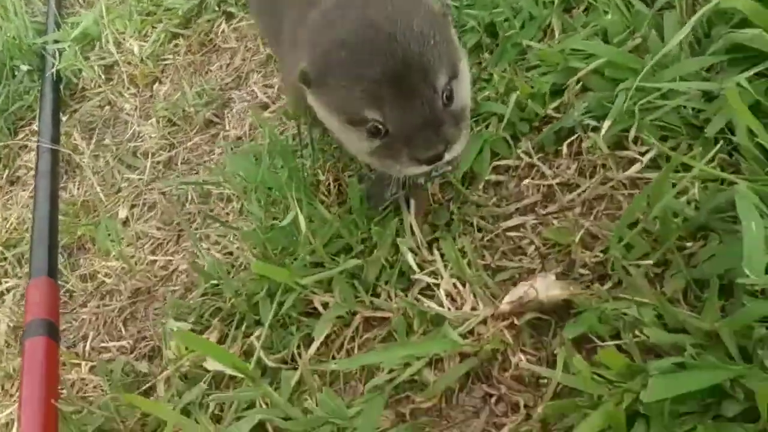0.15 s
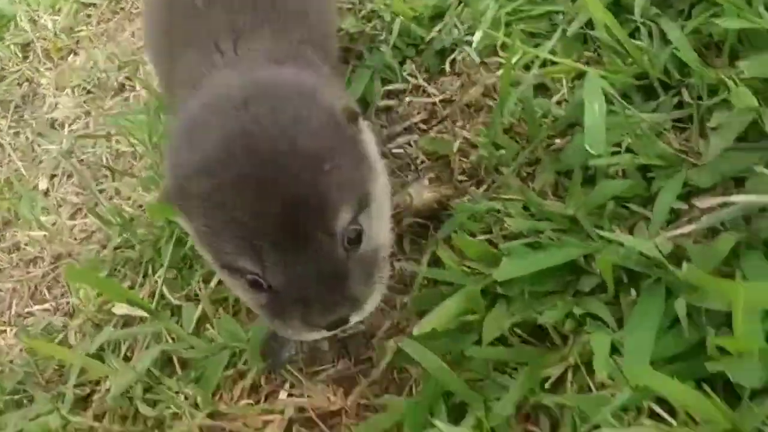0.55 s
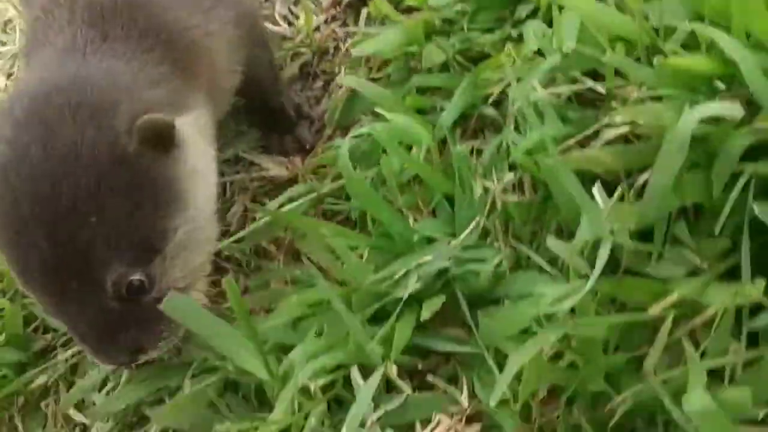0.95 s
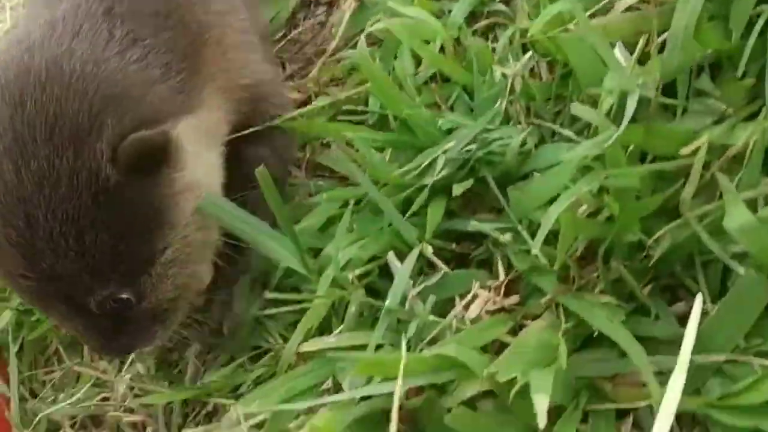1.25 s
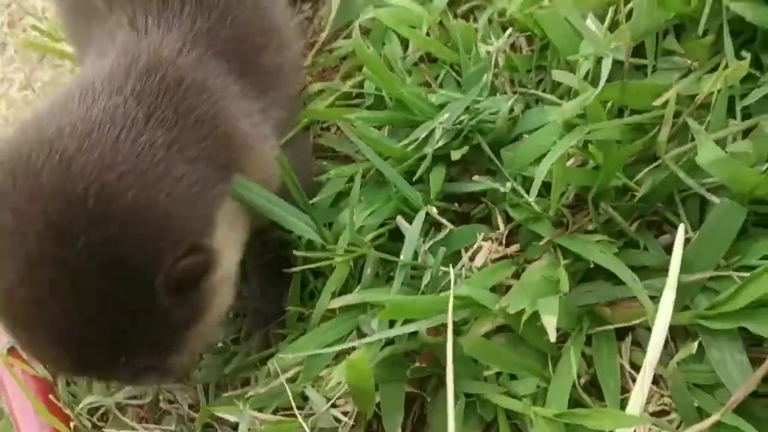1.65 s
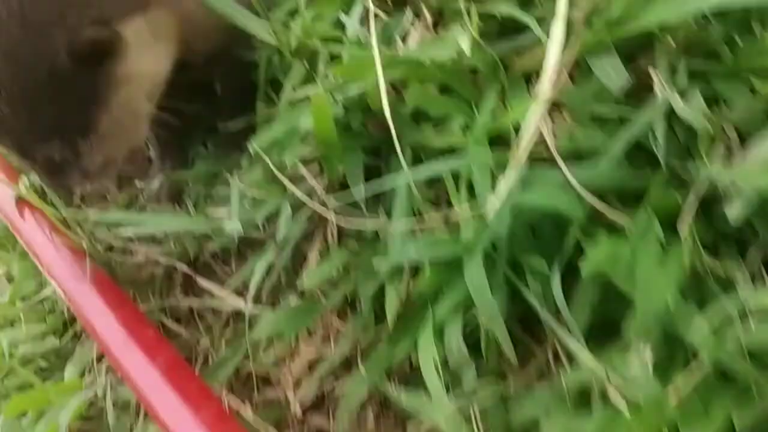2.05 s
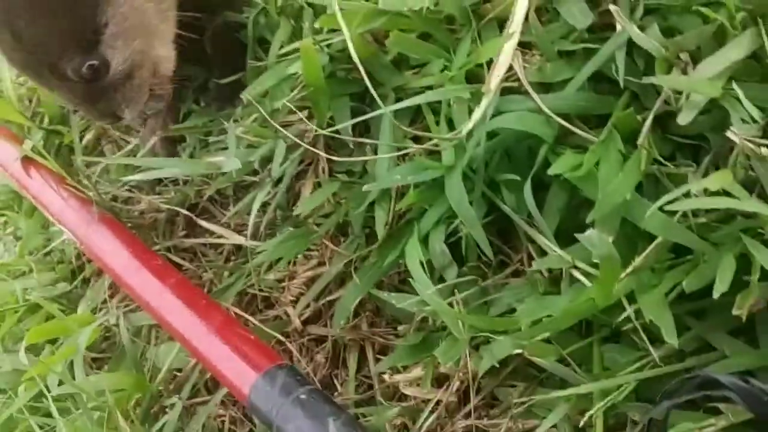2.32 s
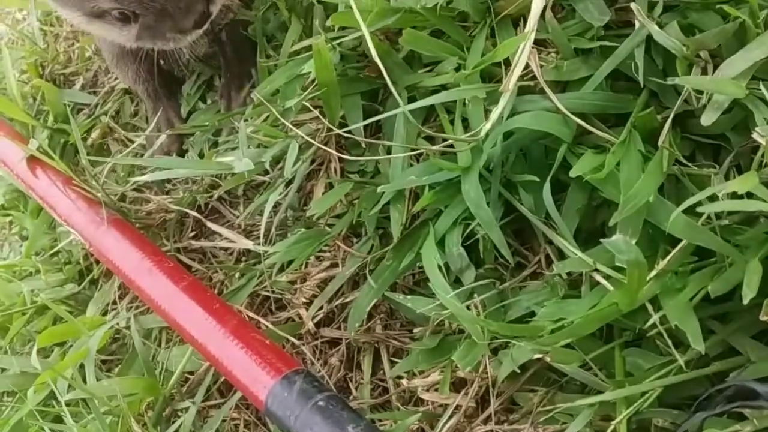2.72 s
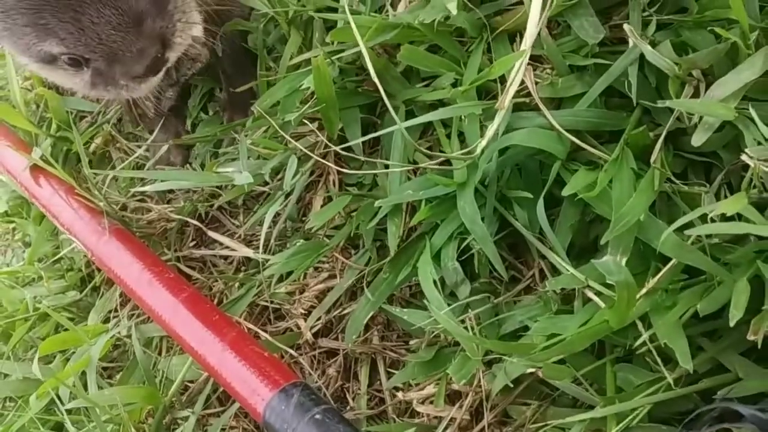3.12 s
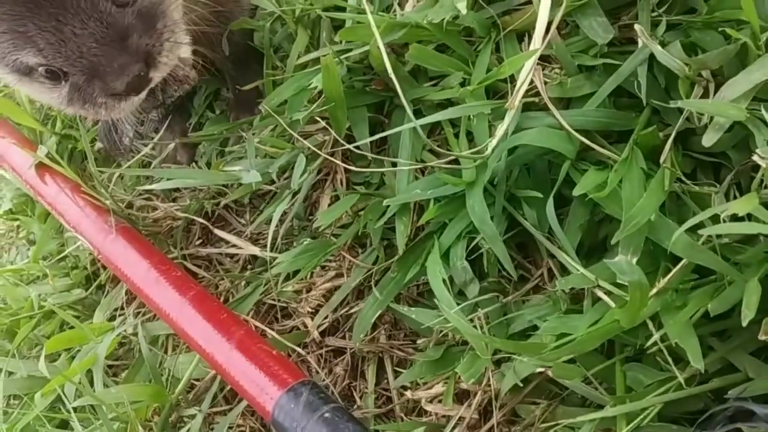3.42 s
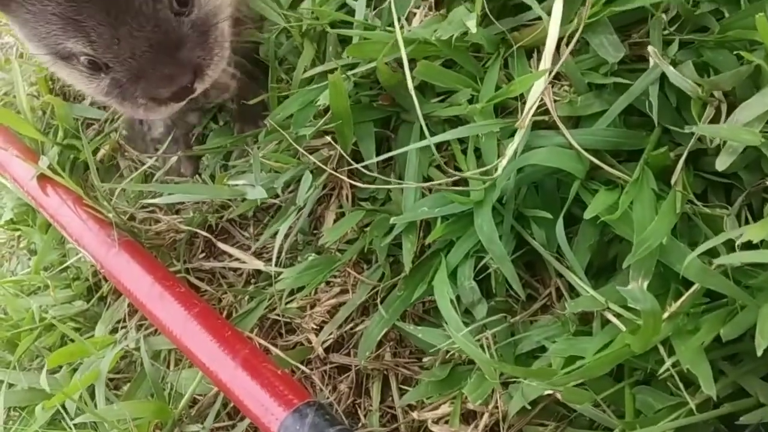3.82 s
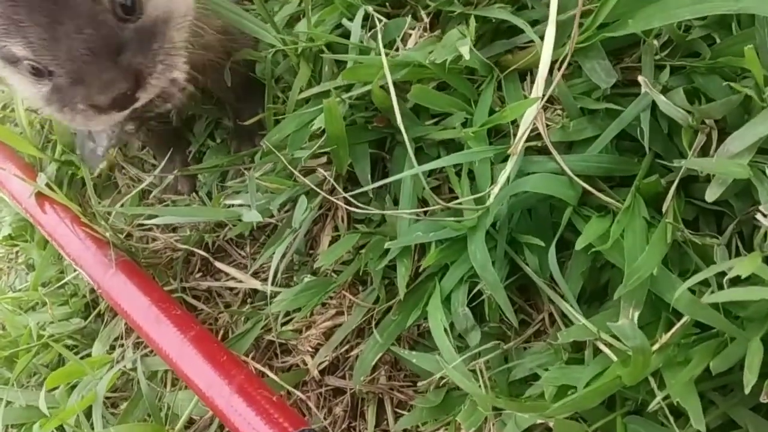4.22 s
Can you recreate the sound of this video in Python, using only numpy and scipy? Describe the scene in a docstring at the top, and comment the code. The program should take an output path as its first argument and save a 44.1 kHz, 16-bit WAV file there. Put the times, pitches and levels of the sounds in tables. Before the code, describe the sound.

An otter pup gives a few piercing, steeply falling squeaks close on the left, over low wind rumble and faint grass rustle.

```python
"""Otter pup calling in grass

An otter pup squeaks five steeply falling calls, close on the left of a stereo recorder: partials on a
gliding pitch, weighted by throat resonances, with turbulent noise where the voice breaks.
Wind and a far low drone, both shaped noise, rumble below, under a faint hiss.
Grass rustles as swelling bright noise and ticks as short decaying bursts.
"""
import sys
import numpy as np
from scipy import signal
from scipy.fft import rfft, irfft
from scipy.io import wavfile
from scipy.ndimage import uniform_filter1d

SR = 44100
rng = np.random.default_rng(int(sys.argv[2]) if len(sys.argv) > 2 else 0)


def waveform_to_disk(signal):
    """Save audio, clipped to [-1, 1], as 16-bit WAV at the path in sys.argv[1]."""
    frames = np.transpose(np.atleast_2d(signal))
    scaled = np.clip(frames, -1, 1) * 32767
    samples = np.round(scaled).astype(np.int16)
    wavfile.write(sys.argv[1], SR, samples)


N = 192756


def from_db(db):
    """Decibel law: an amplitude gain is ten to the power of level over twenty."""
    return 10 ** (np.asarray(db) / 20)


def rms_one(x):
    """Power normalisation: divide by the root mean square."""
    return x / np.sqrt(np.mean(x ** 2) + 1e-20)


def at_hz(points, hz):
    """Spectral envelope: second column interpolated on a logarithmic frequency axis."""
    freq_hz, value = np.array(points).T
    return np.interp(np.log(hz), np.log(freq_hz), value)


def bin_hz():
    """Discrete spectrum: the frequency of each bin, with 1 Hz as the floor."""
    return np.maximum(np.fft.rfftfreq(N, 1 / SR), 1)


def shaped(x, points):
    """Linear filtering: each frequency is scaled by an envelope in dB."""
    return irfft(rfft(x) * from_db(at_hz(points, bin_hz())), N)


def drift(rate_hz):
    """Random modulation: white noise through two one-pole low-passes, scaled to rms 1."""
    pole = np.exp(-2 * np.pi * rate_hz / SR)
    noise = rng.standard_normal(N + SR)
    # the first second lets the filter settle
    return rms_one(signal.lfilter([1], [1, -2 * pole, pole ** 2], noise)[SR:])


def swells(centre_s, peak_db, fall_db_per_s, hold_s=0):
    """Exponential growth and decay: one gain row an event, straight dB slopes around a held peak."""
    away_s = np.maximum(abs(np.arange(N) / SR - centre_s[:, None]) - hold_s, 0)
    return from_db(peak_db[:, None] - fall_db_per_s * away_s)


def tearing():
    """Onset of turbulence: the gain of the rasp rises wherever the voice breaks."""
    # voice breaks, where the airflow tears: middle_s, half_length_s, rasp_db
    voice_breaks = [(0.027, .025, -62), (0.134, 0.0028, -65), (0.223, 0.0068, -49), (2.605, 0.0088, -44),
                    (2.631, .008, -35), (2.652, 0.0059, -23), (2.681, 0.018, -34), (2.787, .001, -31),
                    (2.82, .028, -56), (3.16, .006, -45), (3.214, 0.028, -63), (2.968, 0.019, -44),
                    (3, 0.013, -38.5), (3.254, 0.0056, -37.5), (3.276, 0.0061, -28), (3.319, 0.0052, -34),
                    (3.33, 0.014, -43), (3.615, .002, -29), (3.624, 0.0024, -20), (3.641, 0.016, -25),
                    (3.671, 0.0095, -35.5), (4.138, 0.006, -21.5), (4.151, 0.013, -27), (4.205, 0.013, -43)]
    middle_s, half_s, rasp_db = np.transpose(voice_breaks)
    return swells(middle_s, rasp_db, fall_db_per_s=1398, hold_s=half_s[:, None]).max(axis=0)


def torn_air(strand_db, flicker_db):
    """Turbulence exciting cavity resonances: broad noise plus strands that flare independently; rms 1."""
    # spectrum of the broad turbulence: freq_hz, level_db
    rasp_colour = [(1800, -48), (2700, -34), (3300, -15), (4200, 6), (5200, -2), (6500, -22), (8500, 8),
                   (10000, 15), (12000, -13), (14500, -3), (16000, 4)]
    # cavities in which torn airflow rings: freq_hz, width_hz, level_db
    rasp_modes = [(3610, 170, 1), (4700, 240, 3.5), (5950, 180, 5.5), (8380, 200, 5), (10450, 670, 7.5),
                  (12100, 330, 8), (14600, 410, 4), (14400, 750, -6)]
    air = rms_one(shaped(rng.standard_normal(N), rasp_colour)) * from_db(2.0 * drift(250))
    for freq_hz, width_hz, level_db in rasp_modes:
        pole = np.exp(-np.pi * width_hz / SR)
        resonator = [1, -2 * pole * np.cos(2 * np.pi * freq_hz / SR), pole ** 2]
        ring = signal.lfilter([1, 0, -1], resonator, rng.standard_normal(N))
        air += from_db(strand_db + level_db + flicker_db * drift(57)) * rms_one(ring)
    return rms_one(air)


def call_sound(call, upper_db, tilt_db, upper_fray, chance, breaks, rasp_noise,
               flutter_db, wobble, skirt_db, patchy_db, jitter=.004):
    """Source-filter voice: throat-weighted partials of a gliding pitch, unsteadied by rasp."""
    # resonances of throat and mouth: freq_hz, gain_db
    throat = [(1200, -25.5), (1600, -14.5), (1900, -1), (2250, -12), (3000, -16.5), (3500, -18),
              (4500, -25), (5600, -13), (7200, 0.5), (8200, -0.5), (9800, -8.5), (11700, -2.5), (13000, -7),
              (15800, 3)]
    # third to eighth partial against the upper level: level_db
    upper_fall_db = [10, -4.5, -9.5, -21, -30, -33]
    tail_hz, tail_lift_db = 1880, 1   # below this pitch the voice is clean, its upper partials stand out
    upper_glide_db = -0.8743   # change of the upper partials for each octave a second of glide

    t = np.arange(N) / SR
    point_s, *columns = np.transpose(call)
    on = (t >= point_s[0]) & (t < point_s[-1])
    pitch, first_db, second_db = [np.interp(t[on], point_s, c) for c in columns]
    pitch = uniform_filter1d(pitch, size=200, mode="nearest")   # the folds retune over a few milliseconds
    fade_in, fade_out = (t[on] - point_s[0]) / .0006, (point_s[-1] - t[on]) / .002
    fade = np.clip(np.minimum(fade_out, fade_in), 0, 1)

    loudest_db = np.maximum(first_db + at_hz(throat, pitch), second_db + at_hz(throat, 2 * pitch))
    rasp = breaks[on]
    rough = np.clip(rasp / from_db(loudest_db), 0, 1)   # noise against tone
    glide = abs(np.gradient(np.log2(pitch))) * SR   # octaves a second
    glide = uniform_filter1d(glide, size=400, mode="nearest")
    tail = np.clip((tail_hz - pitch) / 200, 0, 1)
    sway, fray, slow_a, slow_b, *shake = [c[on] for c in chance]
    phase = 2 * np.pi * np.cumsum(pitch * (1 + (jitter + wobble * rough ** 2) * sway)) / SR

    upper_level = second_db + upper_db + upper_glide_db * glide + tail_lift_db * tail
    levels = [first_db, second_db]
    levels += [upper_level + fall_db + tilt_db * k for k, fall_db in enumerate(upper_fall_db)]
    sound = rasp * rasp_noise[on]
    for k, level_db in enumerate(levels, 1):
        unsteady_db = flutter_db * rough * (np.tanh(shake[k % 3]) - .4)   # a rough voice keeps dropping out
        # cycle-to-cycle unevenness spreads noise around each line
        skirt = 1 + from_db(skirt_db) * rough * fray * min(k - .6, 2)
        if k > 2:   # upper partials come and go, and fray more the higher they are
            unsteady_db += patchy_db * (np.tanh(2.9 * (slow_a, slow_b)[k % 2]) - .5)
            skirt += upper_fray * fray * (k - 2) * (1 - tail) * (k * pitch < 15500)
        if k == 1:   # in a high voice break the lowest partial dissolves into a band of noise
            torn = np.clip(2.5 * rough, 0, 1) * np.clip((pitch - 3700) / 600, 0, 1)
            skirt = (1 - torn) * skirt + .7 * torn * fray
        gain = from_db(level_db + at_hz(throat, k * pitch) + unsteady_db)
        audible = k * pitch < SR / 2.2   # guards against aliasing
        sound += np.sqrt(2) * gain * skirt * np.sin(k * phase) * audible
    out = np.zeros(N)
    out[on] = fade * sound
    return out


def pup(scatter_db, scatter_t60):
    """Interaural differences: the right port is shaded and shifted in time; ground and grass scatter."""
    # one table a note (the second call cracks into two): time_s, pitch_hz, first_partial_db, overtones_db
    notes = [
        [(0.0, 5875, -17.5, -33), (0.032, 6035, -15.5, -21), (0.068, 5500, -27, -23), (0.098, 5620, -23, -23),
         (0.118, 5350, -21.5, -30), (0.134, 4830, -22, -31.5), (0.146, 4620, -17, -25.5),
         (0.17, 4580, -20, -27), (0.194, 4520, -22.5, -25.5), (0.216, 4130, -20, -24), (0.224, 3480, -10, -39),
         (0.232, 3280, -3.5, -33), (0.26, 3125, -2.5, -23.5), (0.29, 2950, -10.5, -33.5),
         (0.304, 2820, -19.5, -46), (0.312, 2760, -18, -50)],
        [(2.591, 7020, -15, -40), (2.594, 7240, -9.5, -22), (2.606, 7410, -4, -24), (2.615, 7190, -8.5, -22),
         (2.624, 6640, -5.5, -23), (2.631, 6120, -1, -21), (2.636, 5230, -12, -4.5), (2.652, 4550, -20, -32.5),
         (2.664, 3605, -4, -15), (2.682, 3583, -5, -18), (2.7, 3640, -4, -21.5), (2.707, 3860, -22, -32)],
        [(2.707, 4520, -2.5, -25), (2.74, 4370, -11.5, -20), (2.77, 4166, -20, -18), (2.776, 3700, -3.5, -27.5),
         (2.812, 3354, 3.5, -13.5), (2.832, 3053, 4, -7.5), (2.85, 2767, 1, -11), (2.878, 2610, -16.5, -23),
         (2.892, 2440, -17.5, -18), (2.912, 2105, -28.5, -26), (2.95, 1794, -22.5, -39),
         (2.996, 1555, -14, -16.5), (3.006, 1225, -17, -33), (3.022, 1140, -57, -69)],
        [(3.1595, 7800, -15, -36), (3.165, 6900, -10, -17), (3.174, 6650, -5, -25), (3.179, 6430, -15, -15),
         (3.183, 6100, -5, -13.5), (3.194, 5654, -7.5, -11), (3.203, 5590, -5.5, -11), (3.222, 5800, -4, -12),
         (3.24, 5700, -2.5, -14.5), (3.256, 5100, -12, -11), (3.276, 4480, -12, -23), (3.286, 3584, -2, -18.5),
         (3.304, 3387, -3, -17.5), (3.314, 3160, -14, -10.5), (3.334, 2506, -15, -22), (3.35, 2020, -18.5, -21),
         (3.376, 1740, -20.5, -33), (3.405, 1616, -20, -27), (3.44, 1520, -18.5, -22),
         (3.458, 1450, -24.5, -33)],
        [(3.6025, 7150, -11, -36), (3.6045, 7100, -7.5, -24), (3.612, 6585, -4.5, -25),
         (3.618, 5810, -1.5, -20), (3.624, 4693, -7.5, -28), (3.6285, 3990, -2, -10), (3.632, 3637, -1, -19),
         (3.645, 3176, -11.5, -18), (3.655, 2760, -9.5, -26), (3.662, 2196, -13, -24), (3.673, 1970, -20, -21),
         (3.695, 1910, -24, -26), (3.715, 1770, -26, -42), (3.739, 1584, -24.5, -20.5),
         (3.77, 1523, -24.5, -20.5), (3.801, 1470, -25, -32)],
        [(4.1115, 7060, -35, -50), (4.113, 6600, -8.5, -13), (4.122, 6270, -9.5, -27), (4.127, 6020, 0.5, -13),
         (4.132, 5240, -11, -9.5), (4.142, 4670, -22, -10), (4.15, 3550, 2, -24.5), (4.17, 3588, 0.5, -19.5),
         (4.19, 3410, 2.5, -19), (4.21, 3015, -4.5, -21), (4.234, 2640, -10, -20.5), (4.258, 2100, -31.5, -38),
         (4.282, 1747, -24, -32), (4.31, 1600, -20.5, -18.5), (4.354, 1465, -28.5, -33)],
    ]
    # one a note, upper partials against the overtones: level_db
    upper_levels = [-11, -16, -12.5, -10, -21.5, -11.5]
    # one a note, brightness gained at each further partial: tilt_db
    upper_tilts = [6, 4, 1.5, 2.5, 1, -2]
    # one a note, noise spread around the upper partials, against their height: fraction
    upper_frays = [.03, .3, .2, .3, .35, .15]
    # one a note, as the head turns; negative where the right port leads: lag_s
    right_lags = [-0.0045, .00011, .00011, .0001, .00008, .00012]
    # shading by the recorder body: freq_hz, left_over_right_db
    body_shadow = [(1000, 8), (2500, 1), (3300, 14), (3900, 10), (5000, 11.5), (6000, 22.5), (7000, 12),
                   (8500, 82), (12000, 20), (14500, 15), (16000, 12)]

    # a loose fold edge beats near 1.2 kHz against the voice and splits each line into strands
    edge_level = drift(60)
    edge_phase = 2 * np.pi * np.cumsum(1200 + 250 * drift(20)) / SR
    beating = drift(700) + edge_level * np.sin(edge_phase)
    # pitch sway, fraying, two slow patchinesses, three shakes
    chance = [drift(303), beating, drift(21), drift(19), drift(205), drift(160), drift(191)]
    rasp_noise = torn_air(strand_db=-7, flicker_db=4)
    breaks = tearing()

    hz = np.fft.rfftfreq(N, 1 / SR)
    left, late_spectrum = 0, 0
    for call, upper_db, tilt_db, upper_fray, lag_s in zip(
            notes, upper_levels, upper_tilts, upper_frays, right_lags):
        sound = call_sound(call, upper_db, tilt_db, upper_fray, chance, breaks, rasp_noise,
                           flutter_db=6, wobble=.03, skirt_db=-11, patchy_db=4)
        left = left + sound
        late_spectrum = late_spectrum + rfft(sound) * np.exp(-2j * np.pi * hz * lag_s)
    right = shaped(irfft(late_spectrum, N), [(f, -db) for f, db in body_shadow])

    echo_s = np.arange(2000) / SR
    echoes = rng.standard_normal((2, 2000)) * from_db(scatter_db - 60 * echo_s / scatter_t60)
    echoes[:, :60] = 0   # the first echo travels half a metre further
    echoes[1] = signal.lfilter([.45], [1, -.55], echoes[1])   # the shaded port hears it duller
    return np.array([left, right]) + signal.fftconvolve(left[None], echoes, axes=1)[:, :N]


def stereo_noise(spectrum):
    """Interchannel coherence: ports share the bass, while the treble is unlike and leans left; mid rms 1."""
    # correlation of the two ports: freq_hz, likeness
    port_likeness = [(60, 0.62), (150, 0.86), (380, 0.64), (950, 0.25), (2380, -0.07), (5980, 0.01),
                     (15000, 0.04)]
    # balance of the two ports: freq_hz, left_over_right_db
    port_tilt = [(60, 1.5), (150, -2.5), (380, -1), (950, 0), (2380, 3), (5980, 1.5), (15000, 13)]
    hz = bin_hz()
    mid, side = rfft(rng.standard_normal((2, N))) * from_db(at_hz(spectrum, hz))
    alike = np.clip(at_hz(port_likeness, hz), -1, 1)
    lean_db = at_hz(port_tilt, hz) / 2
    signs = np.array([[1], [-1]])   # left, right
    pair = np.sqrt(1 + alike) * mid + np.sqrt(1 - alike) * side * signs
    pair = irfft(pair * from_db(lean_db * signs), N)
    return pair / np.sqrt(np.mean(pair.mean(axis=0) ** 2))


def wind_on_ports():
    """Flow noise: independent low-frequency noise at each port swells with every buffet."""
    # buffets of wind: time_s, peak_db, left_over_right_db
    gusts = [(0.0, -44, -16), (0.35, -49, -4), (0.579, -53, -1), (0.71, -42, -19), (0.865, -30, -11),
             (0.98, -35, -11), (1.11, -31, -19.5), (1.33, -62, 7.5), (1.9, -34, -23.5), (2.13, -51, -8),
             (2.3, -46, -21), (2.62, -48, -3), (3.06, -41, 9), (3.3, -43, 20), (3.6, -44, 12),
             (3.829, -33.5, 23), (4.156, -28.5, 18.5), (4.37, -38, 24.5)]
    # spectrum of the rumble: freq_hz, level_db
    wind_colour = [(10, -60), (20, 7), (40, -1), (70, -8.5), (130, -19), (250, -20), (500, -63)]
    calm_db = -50
    time_s, peak_db, lean_db = np.transpose(gusts)
    port_gain = from_db(lean_db / 2 * [[1], [-1]])
    buffets = from_db(calm_db) + port_gain @ swells(time_s, peak_db, fall_db_per_s=140)
    return buffets * rms_one(shaped(rng.standard_normal((2, N)), wind_colour))


def drone():
    """Band-wise modulation: a near-steady low noise whose upper edge comes and goes."""
    # spectrum of the drone: freq_hz, level_db
    drone_colour = [(29, -75), (50, -3.5), (86, -2), (130, 0.5), (167, -5.5), (203, -8), (372, -30.5),
                    (408, -30), (600, -36), (780, -73), (1320, -120)]
    # slow change of the drone, the last column above about 230 Hz: time_s, level_db, edge_gain_db
    drone_course = [(0, -34.5, -3), (.5, -36, -0.5), (1, -35, 5), (1.5, -35, -6.5), (2, -36, -2.5),
                    (2.6, -34.5, 3), (3.1, -35.5, 2), (3.6, -36.5, 4.5), (4.0, -35, -1), (4.37, -36, 7)]
    edge_sway_db = 2.0   # the upper edge wavers a few times a second
    time_s, *columns = np.transpose(drone_course)
    level_db, edge_db = [np.interp(np.arange(N) / SR, time_s, c) for c in columns]
    hum = stereo_noise(drone_colour)
    edge = shaped(hum, [(210, -60), (250, 0)])
    edge_gain = from_db(edge_db + edge_sway_db * drift(3.1))
    return from_db(level_db) * (hum + (edge_gain - 1) * edge)


def patchy(x, patchy_db):
    """Octave-band modulation: each octave swells and sinks on its own."""
    spectrum, octave = rfft(x), np.log2(bin_hz() / 250)
    shares = [np.clip(1 - abs(octave - k), 0, 1) for k in range(7)]
    return sum(from_db(patchy_db * drift(10)) * irfft(spectrum * share, N) for share in shares)


def faint_hiss():
    """Broadband noise: a faint hiss whose octaves waver separately."""
    # spectrum of the hiss: freq_hz, level_db
    hiss_colour = [(210, -6.5), (350, -6.5), (647, -6), (1070, -8), (1230, -11), (1950, -8), (2670, -10.5),
                   (5120, -16.5), (7000, -19.5), (9100, -87), (15400, -120)]
    return from_db(-53) * patchy(stereo_noise(hiss_colour), patchy_db=1.8)


def grass_rustle():
    """Friction noise: grainy treble swells each time the pup pushes through the grass."""
    # pushes through the grass: time_s, peak_db
    moves = [(0.0, -52), (0.23, -46.5), (0.58, -51), (0.79, -57.5), (1.21, -56.5), (1.32, -52.5),
             (1.58, -52.5), (1.8, -54.5), (2.1, -56.5), (2.29, -52.5), (2.74, -47), (3.14, -56),
             (3.3, -42.5), (3.795, -49.5), (4.2, -40)]
    # spectrum of the rustle: freq_hz, level_db
    rustle_colour = [(3240, -76), (5500, -5.5), (7520, 3), (15100, -1), (16200, 16), (16500, -39)]
    still_db = -51
    stir = from_db(still_db) + swells(*np.transpose(moves), fall_db_per_s=145).max(axis=0)
    grain = from_db(1.55 * drift(8.1) + 1.6 * drift(260))
    return stir * grain * stereo_noise(rustle_colour)


def ticks(t60):
    """Impulsive release: a blade snaps back as a bright burst that dies within milliseconds."""
    # blades of grass snapping back, levels before the port gains: time_s, level_db, right_drop_db
    snaps = [(1.105, -39, 14), (1.3714, -47, 10), (1.4778, -44, 7.5), (1.549, -39, 11), (1.8598, -27, 16),
             (3.104, -36, 6.0), (3.1438, -43, 13), (3.4778, -33, 17)]
    pulse = np.zeros((2, N))
    for time_s, level_db, right_drop_db in snaps:
        pulse[:, round(time_s * SR)] = from_db(level_db + np.array([4, 6 - right_drop_db]))
    decay = from_db(-60 / (t60 * SR))
    fall = signal.lfilter([1], [1, -decay], pulse + 1e-18)
    band = signal.butter(2, [4500, 13000], "band", fs=SR, output="sos")
    return signal.sosfilt(band, fall * rng.standard_normal((2, N)))


def scene():
    """Superposition: the pressures of pup, air and grass add."""
    voice = pup(scatter_db=-42, scatter_t60=.06)
    background = wind_on_ports() + drone() + faint_hiss() + grass_rustle()
    return voice + background + ticks(t60=0.0073)


def record(dry):
    """Band limiting: a steep low-pass removes everything above 16.4 kHz."""
    return signal.sosfilt(signal.cheby2(18, 90, 16400, fs=SR, output="sos"), dry)


dry = scene()
out = record(dry)
waveform_to_disk(out)
```